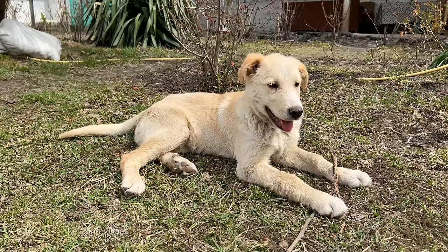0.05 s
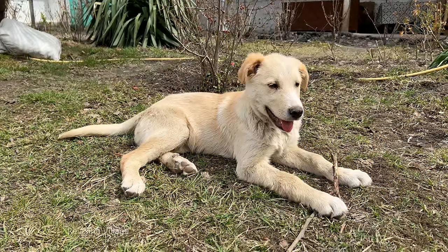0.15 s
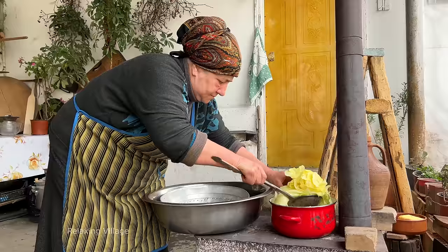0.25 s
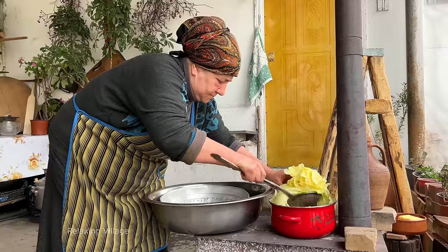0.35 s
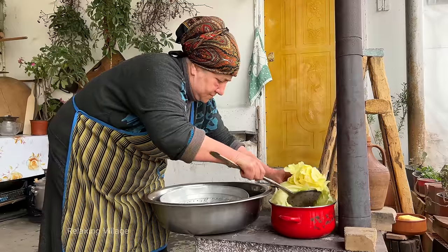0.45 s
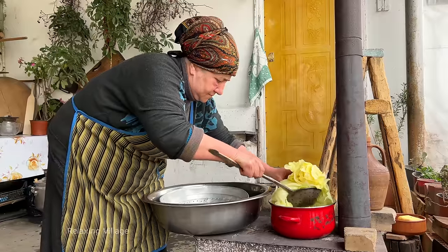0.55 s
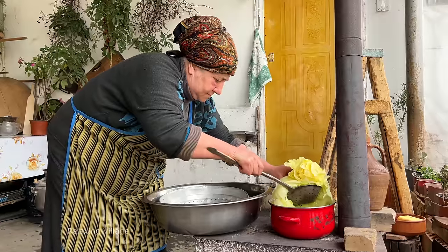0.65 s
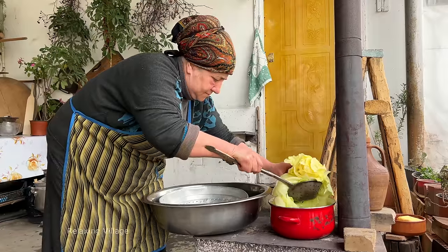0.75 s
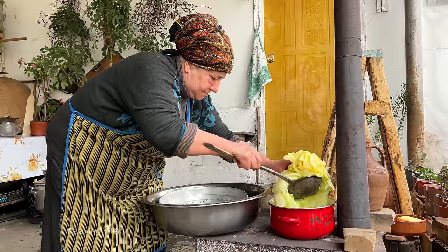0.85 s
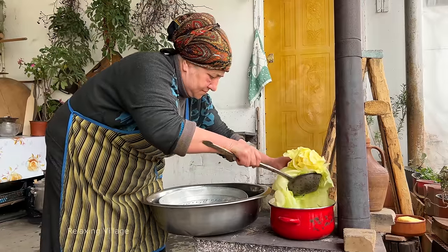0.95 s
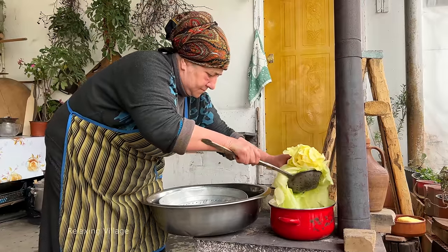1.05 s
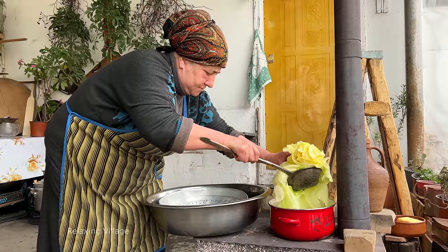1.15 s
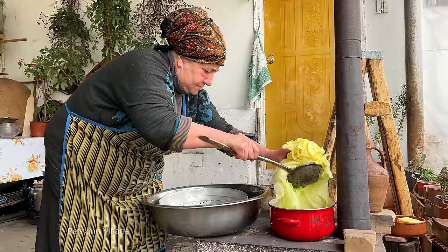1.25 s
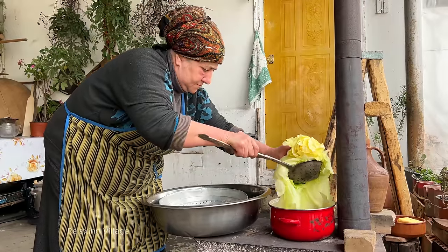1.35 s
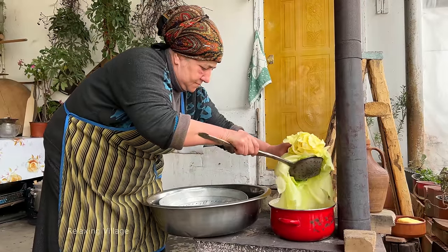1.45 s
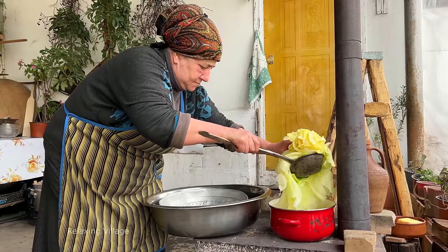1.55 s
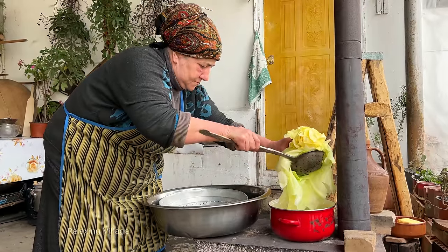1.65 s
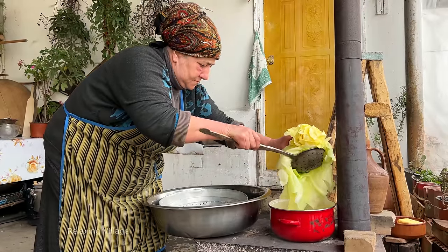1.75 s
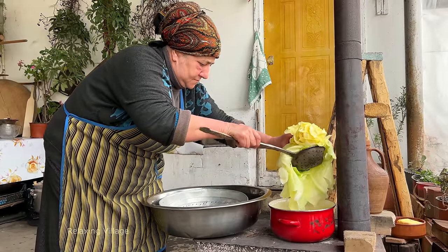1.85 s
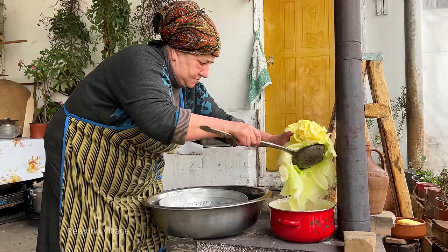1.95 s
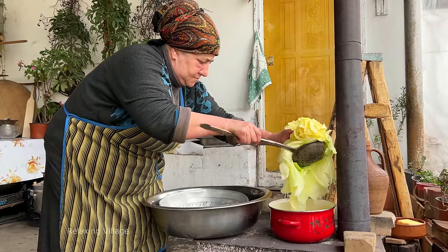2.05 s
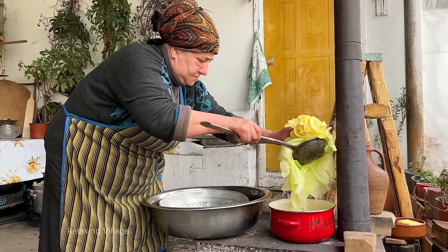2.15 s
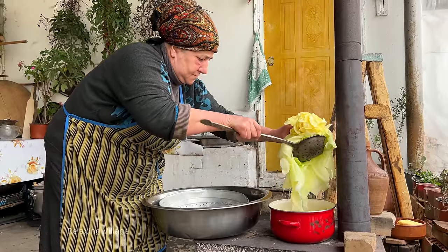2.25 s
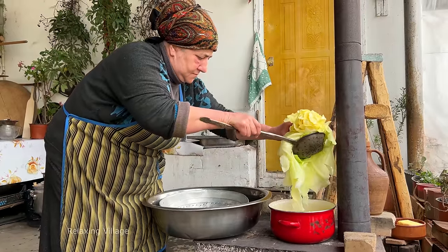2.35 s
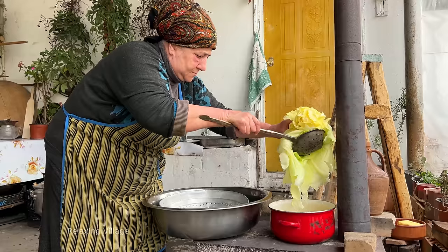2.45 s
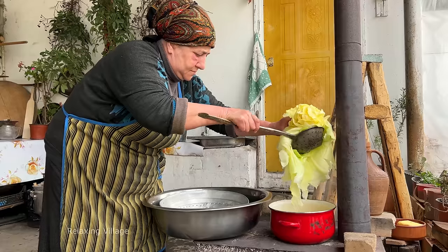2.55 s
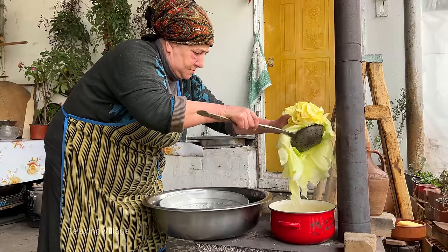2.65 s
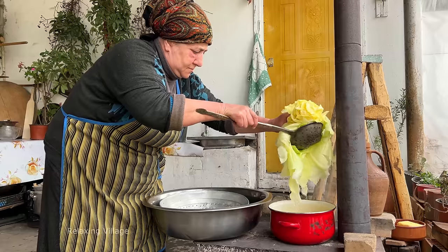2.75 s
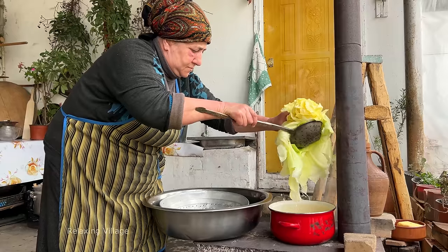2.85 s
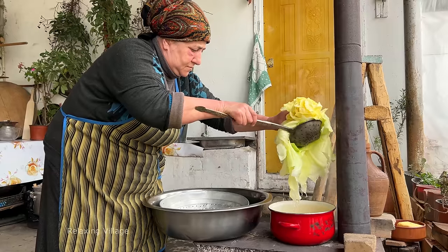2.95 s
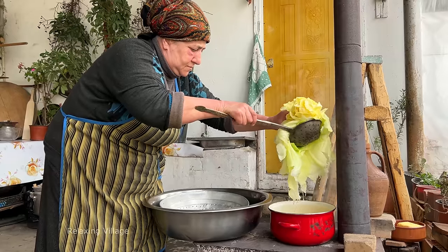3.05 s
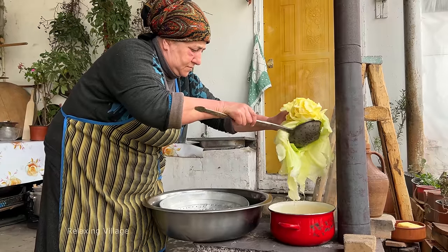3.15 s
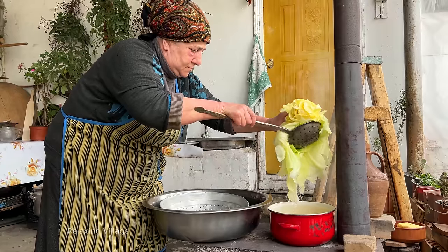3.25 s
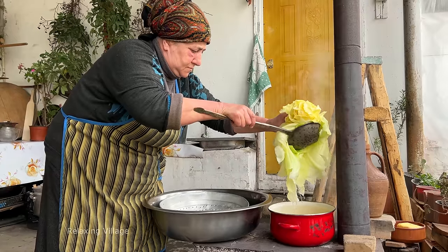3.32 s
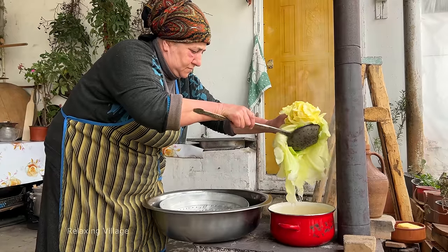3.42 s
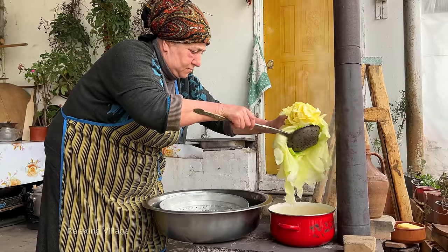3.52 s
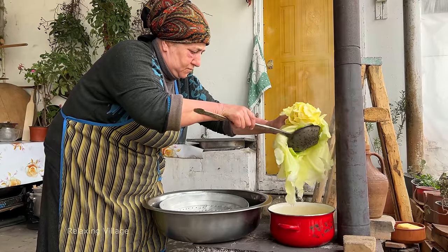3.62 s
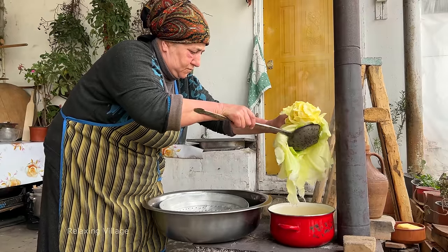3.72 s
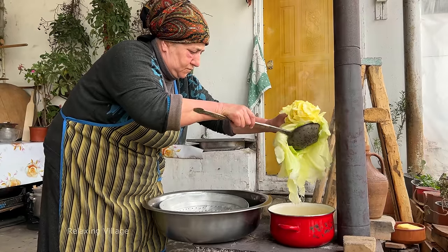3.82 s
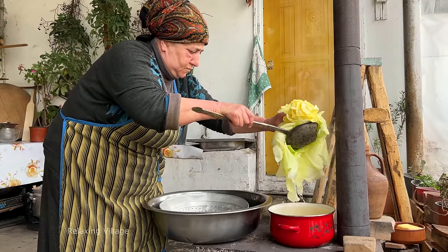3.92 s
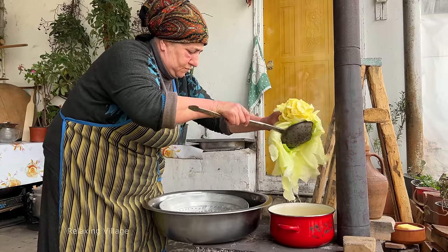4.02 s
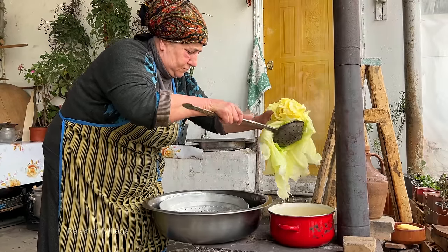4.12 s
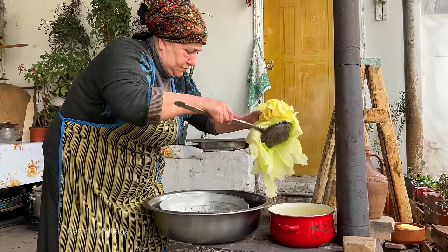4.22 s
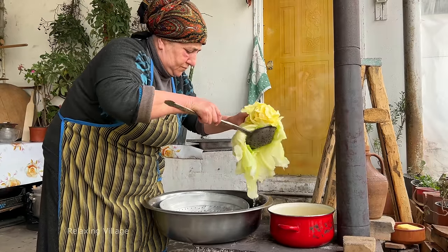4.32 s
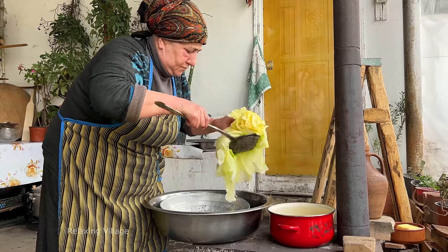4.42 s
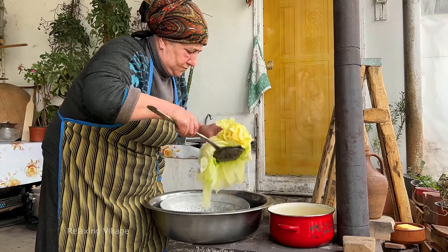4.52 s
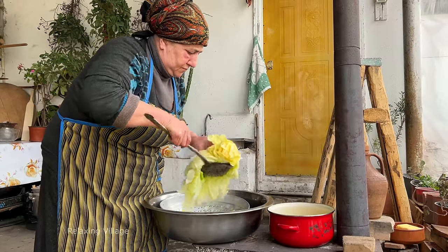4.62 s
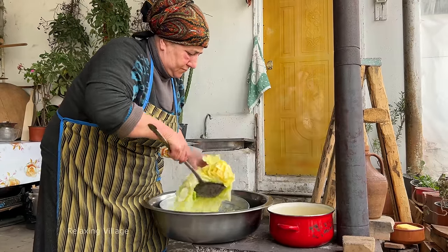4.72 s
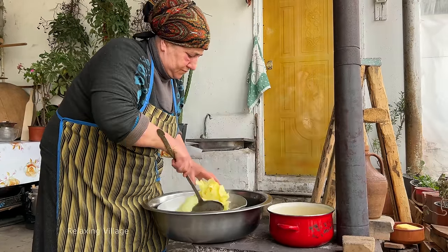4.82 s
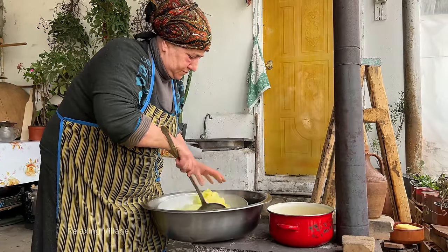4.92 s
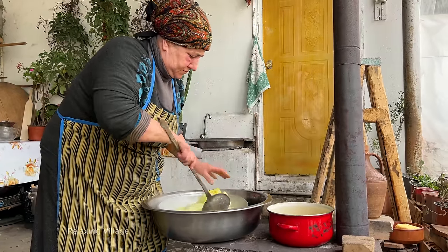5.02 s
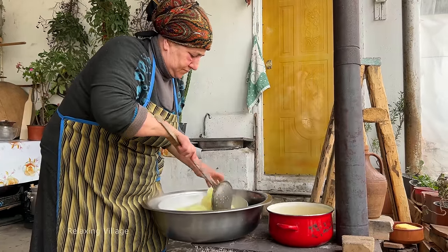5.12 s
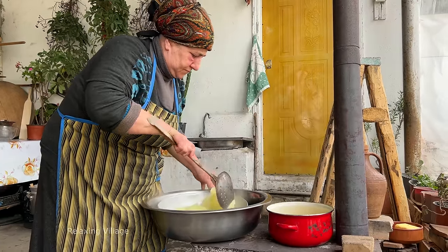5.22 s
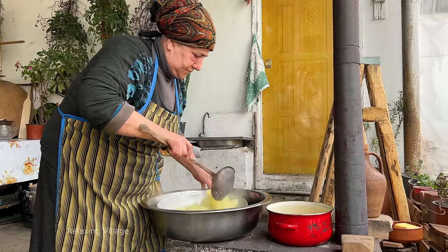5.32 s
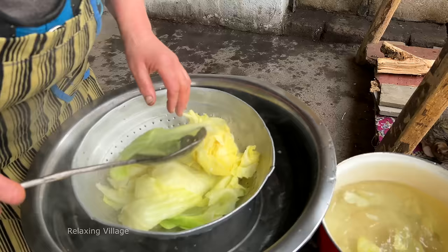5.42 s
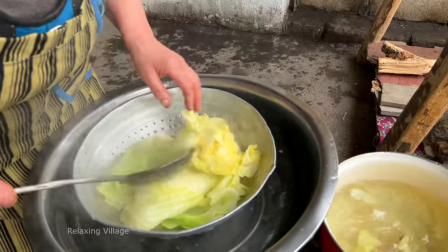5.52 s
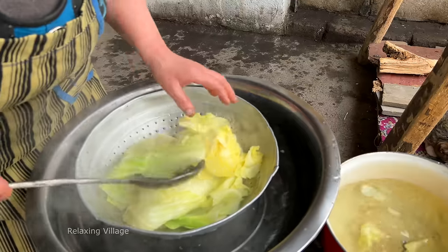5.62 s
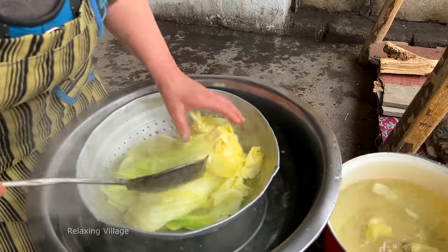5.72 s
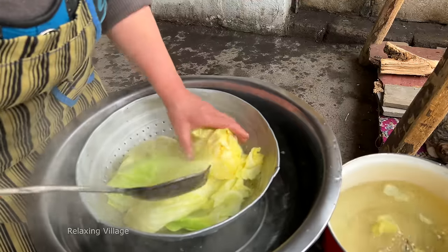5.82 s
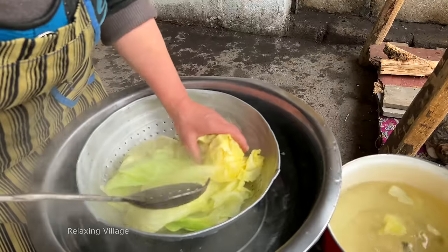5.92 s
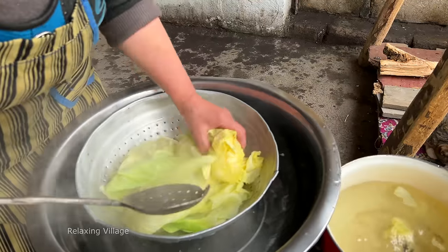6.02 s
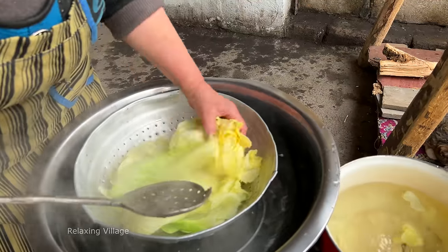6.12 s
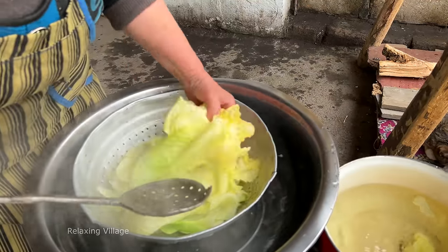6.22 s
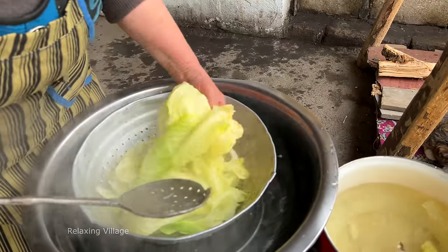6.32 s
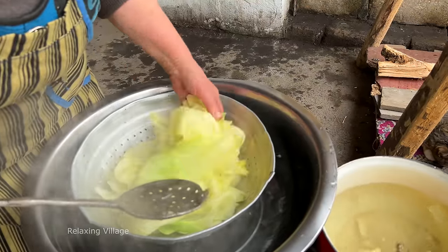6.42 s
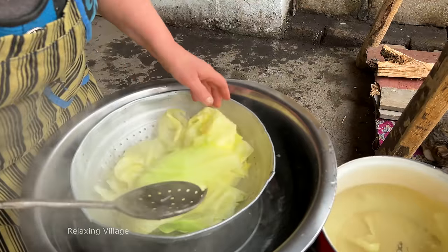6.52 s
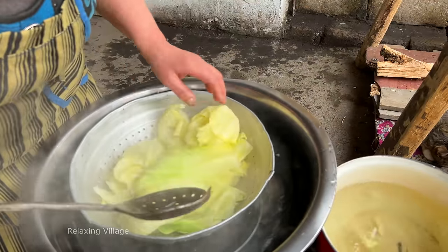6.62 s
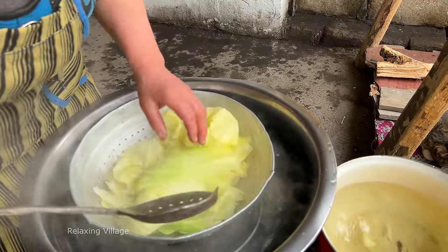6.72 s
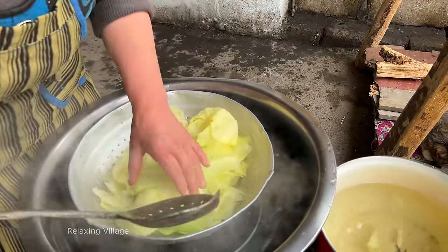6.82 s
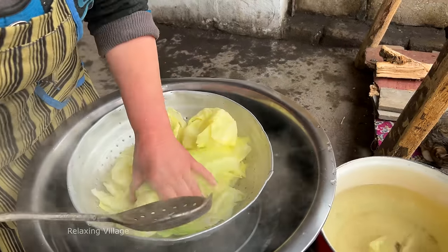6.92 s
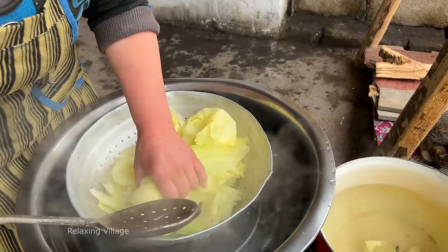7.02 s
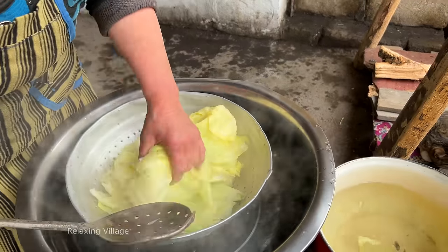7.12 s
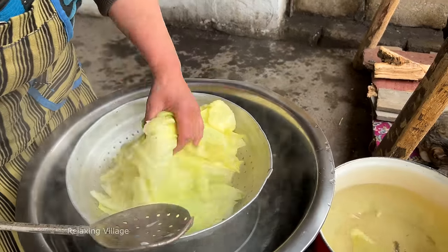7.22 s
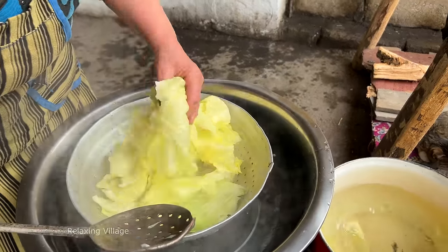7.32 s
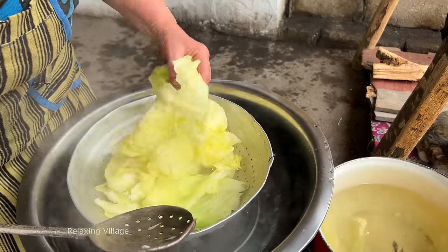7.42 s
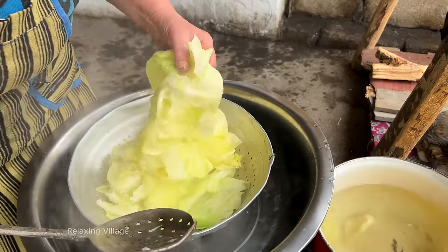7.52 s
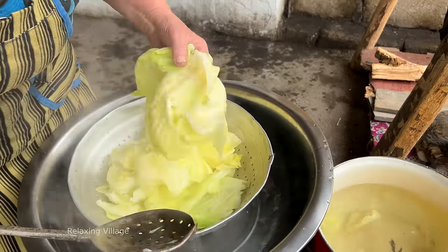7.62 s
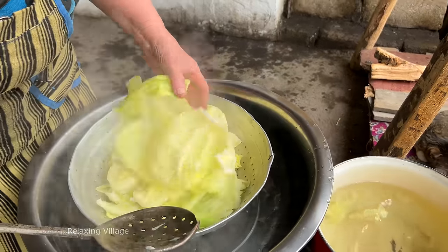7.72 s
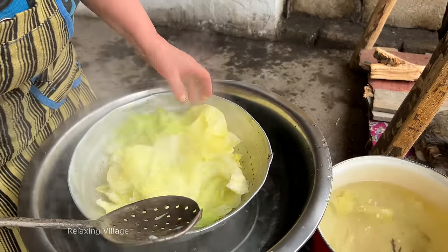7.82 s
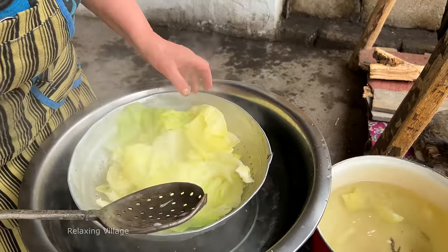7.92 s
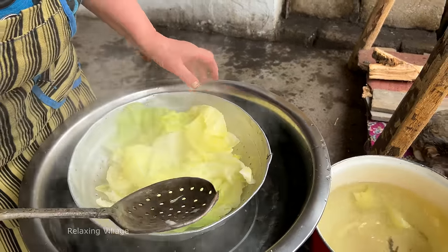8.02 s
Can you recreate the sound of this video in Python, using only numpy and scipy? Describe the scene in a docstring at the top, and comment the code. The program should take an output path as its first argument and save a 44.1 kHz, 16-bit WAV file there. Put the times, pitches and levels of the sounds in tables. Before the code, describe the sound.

Fluttering wind, then dripping and sizzling over a rumbling stove, a heavy wet cabbage flop in a metal basin, and soft squelchy handling.

```python
"""A breeze, as fluttering noise, stops abruptly and gives way to a yard where a stove fire rumbles.
Leaves rustle out of a pot; water trickles back as patter and ringing bubbles; spills sizzle on the hot
plate as dense noise bursts. The flue throbs as a wavering low tone, and the stove top knocks as damped
modes. Wet cabbage flops into a colander in a steel basin: thud, slap, gulping air, spray, ringing steel.
Last, a hand turns and squeezes the leaves: squelching noise, tiny bubbles and smaller landings."""
import sys
import numpy as np
from scipy import signal
from scipy.fft import rfft, irfft, next_fast_len
from scipy.io import wavfile
from scipy.ndimage import uniform_filter1d, map_coordinates

SR = 44100
rng = np.random.default_rng(int(sys.argv[2]) if len(sys.argv) > 2 else 0)


def to_wav(sig):
    """Store sig (one row per channel, or 1-D mono) as 16-bit WAV at the path in sys.argv[1].

    Samples outside -1..1 are clipped; the rate is SR.
    """
    pcm = np.clip(np.atleast_2d(sig), -1, 1) * 32767
    pcm = np.round(pcm).astype(np.int16)
    wavfile.write(sys.argv[1], SR, pcm.T)  # frames by channels


N = 355446

# All levels in the tables are relative: the functions add their own trims in dB.
GARDEN_END_S, TURNING_START_S = 0.295, 5.469
SIMMER_START_S = 1.392  # the plate gets wet
HISS_FADE_DB_PER_S, SPIT_FADE_DB_PER_S = 1.16, 1.5  # the plate slowly dries; spitting fades faster
SIMMER_HISS_DB, SIMMER_SPIT_DB = -46, -57
SURGE_RISE_S, SURGE_T60_S = 0.01, 0.46
TOUCH_LEAD_S, TOUCH_RISE_S, TOUCH_DB = 0.025, .05, -7  # leaf tips touch down ahead of the heap
FLOP_SAG_DB_PER_S = 64  # a landing weakens while the heap collapses
DAMPED_ABOVE_HZ = 440  # with leaves settled in the colander, modes above this die sooner
TOP_HZ = 15900  # upper band limit

# Water running into the pot. Each row: time in seconds, level in dB.
TRICKLE_FLOW = [(1.33, -72), (1.38, -52.5), (1.57, -54.5), (1.99, -62), (2.025, -50), (2.08, -53.5),
                (2.604, -55.5), (2.8, -52.5), (3.0, -54), (3.2, -51.5), (3.5, -57), (4.06, -61),
                (4.1, -45.5), (4.23, -51), (4.583, -52), (4.8, -59)]
# Rumble of the fire. Each row: time in seconds, level in dB.
FIRE_RUMBLE = [(0.3, -63), (1.8, -63.5), (2.25, -54.5), (3.5, -57), (3.8, -50), (4.9, -52.5), (5.25, -53),
               (5.45, -61), (5.75, -52.5), (6.1, -61.5), (6.28, -56.5), (6.5, -52.5), (7.1, -59.5),
               (7.7, -57), (8.06, -60)]
# Fattest drops falling into the pot. Each row: start in seconds, level in dB, initial pitch in Hz, t60 in seconds.
FAT_DROPS = [(0.845, -42, 1890, 0.018), (0.972, -51, 1335, .06), (1.046, -42.5, 2400, .025),
             (2.020, -38, 790, 0.048), (2.166, -38, 804, 0.058), (2.690, -42, 1220, 0.04),
             (2.747, -34, 810, .02), (2.768, -38, 670, .04), (2.795, -35, 625, 0.066),
             (2.816, -35.5, 740, 0.038), (2.814, -37, 1215, .04), (2.863, -39.5, 824, .04),
             (2.912, -39, 1215, 0.05), (2.921, -39, 767, .04), (3.06, -40, 730, .035),
             (3.117, -35.5, 1340, .025), (3.126, -34, 775, .03), (3.155, -32, 755, 0.035),
             (3.177, -35, 792, .03), (3.198, -34, 776, 0.041), (3.212, -38, 737, 0.056),
             (3.246, -45, 795, .06), (3.265, -41, 608, .06), (3.289, -43, 628, 0.045),
             (3.286, -43.5, 1220, .05), (3.311, -45, 1200, 0.043), (3.35, -46, 820, 0.058),
             (3.369, -41.5, 1260, 0.04), (3.383, -37, 846, 0.042), (3.678, -37.5, 810, 0.035),
             (3.760, -31, 820, .02), (3.762, -38, 1190, .02), (3.996, -34, 783, 0.038),
             (4.22, -37, 1160, 0.036)]
# Taps of the skimmer and spits of water. Each row: start in seconds, level in dB, pitch in Hz, ring t60 in seconds.
TAP_EVENTS = [(0.615, -53, 1515, 0.05), (0.69, -39.5, 780, 0.016), (.953, -40, 740, 0.025),
              (1.05, -60, 2509, 0.25), (1.322, -32.5, 720, 0.025), (1.323, -34, 2340, 0.012),
              (1.348, -42, 2500, .02), (1.36, -40.5, 2510, .02), (1.397, -35.5, 1880, 0.015),
              (2.337, -31.5, 8200, 0.022), (3.118, -37, 4430, 0.02), (4.416, -38, 3850, 0.014),
              (4.459, -42, 1880, .025), (4.471, -37, 1700, 0.039), (5.498, -41.5, 5000, 0.02),
              (5.527, -45, 1000, 0.013), (5.589, -30, 1090, 0.022), (5.6, -44, 1680, 0.012),
              (5.634, -41, 3260, .012), (5.647, -49, 2200, 0.01), (5.741, -42, 750, 0.011),
              (5.743, -50, 2070, 0.011), (5.767, -35.5, 680, 0.02), (5.767, -45, 1950, .012),
              (5.869, -43.5, 8050, .006), (6.468, -41.5, 2780, 0.036), (6.509, -47, 2780, .04),
              (6.522, -49, 2900, .035), (6.532, -43, 3260, 0.027), (6.538, -39, 3350, 0.028),
              (6.589, -34, 930, 0.021), (6.859, -46, 5130, 0.0061), (7.281, -45, 3600, .015),
              (7.353, -36, 11000, .005), (7.569, -43.5, 3800, .02), (7.578, -39, 1550, 0.02),
              (7.821, -42, 3000, 0.019), (7.829, -38, 3920, 0.0079), (7.825, -42, 11000, .005)]
# Wet leaves landing. Each row: start in seconds, thud, slap and spray levels in dB, spray cutoff in Hz,
# collapse time in seconds, pitch of the trapped air in Hz, rise time constant and t60 in seconds.
LANDINGS = [(4.845, -26, -26, -25.5, 13800, 0.088, 633, 0.0028, 0.47),
            (4.939, -47, -27, -43, 14000, 0.0041, 1560, 0.0034, 0.19),
            (5.524, -43, -58, -72, 5000, 0.0048, 600, 0.0026, 0.096),
            (5.584, -39, -41.5, -46.5, 5500, 0.012, 850, .004, 0.19),
            (5.63, -51, -48, -45.5, 9000, 0.016, 2200, .002, 0.14),
            (5.723, -53, -68, -58, 9000, 0.0017, 1210, 0.0033, 0.1),
            (5.766, -48.5, -64, -60, 8000, 0.0032, 800, 0.0022, 0.15),
            (6.458, -43.5, -44, -41.5, 9000, 0.0086, 780, .005, 0.037),
            (6.590, -45.5, -51, -46, 14000, 0.011, 935, 0.0019, 0.3),
            (7.348, -47.5, -48, -43, 14000, 0.003, 1100, 0.002, 0.25),
            (7.559, -46, -46.5, -47.5, 4500, 0.0099, 1040, 0.0037, 0.19),
            (7.576, -46, -44.5, -64, 4500, 0.0077, 900, 0.0019, 0.08),
            (7.774, -51, -54, -57, 9000, 0.027, 910, 0.0036, 0.22),
            (7.813, -49, -47, -47, 14000, 0.0062, 1260, 0.0065, 0.17),
            (7.965, -49, -48.5, -48.5, 3800, 0.018, 840, 0.0091, 0.13)]
# Modes of the steel basin with its colander. Each row: mean pitch in Hz, level in dB, undamped t60 in seconds.
BASIN_MODES = [(202.2, 3, 0.52), (221.4, 1.5, 0.54), (251, 4, 0.5), (272, -6.5, 0.94), (306, 9.5, 0.31),
               (339, -4, 0.9), (354, 2, 0.82), (454, -2, 0.31), (536, -3, 0.53), (575, 1.5, 0.72),
               (620, 2, 0.84), (668, -6, 0.64), (720, -3, 0.3), (820, -13, 0.45), (877, -9, 0.61),
               (1164, 0, 0.78), (1660, 0.5, 0.71), (1896, -4, 0.62), (2065, -11.5, 0.81), (2490, -3, 0.81)]
# Resonances of the air in the pot. Each row: centre in Hz, width in Hz, level in dB.
POT_RESONANCES = [(676, 220, -6.5), (812, 106, -3), (1190, 124, -4), (1886, 59, -7.5)]
# Spectra of the noises, before each is brought to rms 1. Each row: frequency in Hz, level in dB.
BREEZE_SPECTRUM = [(25, -21), (90, -11.5), (150, -12.5), (250, -7), (370, -3), (600, -17.5), (1300, -18.5),
                   (2000, -23), (5500, -26.5), (9000, -33), (12300, -41), (16000, -43)]
YARD_SPECTRUM = [(100, -10), (200, -7), (380, -8.5), (800, -9.5), (3000, -17), (7000, -26), (12000, -38),
                 (16000, -47)]
RUMBLE_SPECTRUM = [(20, -36), (50, -2), (100, 0), (160, -6), (280, -13), (700, -20), (2000, -46.5)]
FLUE_SPECTRUM = [(20, -21), (48, -6), (70, 3.0), (110, -43), (300, -58)]
HISS_SPECTRUM = [(1200, -39), (3000, -8.5), (4200, -7), (5500, -1.5), (7200, -1.5), (8700, 1),
                 (10000, -3.5), (12300, -9), (15500, -4.5)]
SPIT_SPECTRUM = [(150, -41), (450, -1), (800, -2.5), (1500, -1.5), (2000, 0.5), (2800, 3.5), (3700, -5.5),
                 (7000, -19)]
THUD_SPECTRUM = [(40, -32), (150, -26), (210, 7.5), (290, -1.5), (400, -2.5), (540, -6), (800, -11.5),
                 (1500, -16.5), (4000, -42)]
SPRAY_SPECTRUM = [(600, 0), (2000, 2), (3000, 1.5), (6000, 2), (8000, -2), (10000, -2), (12300, -12.5),
                  (15500, -7.5)]
SLIDE_SPECTRUM = [(200, 4), (600, 2), (1500, 1.5), (2700, 3), (4000, 1.5), (7000, -3), (8800, 1.5),
                  (10500, -2), (12300, -24), (15500, -16)]
LIFT_SPECTRUM = [(300, -9), (1200, 4.5), (2700, 3), (4000, -13), (6500, -6.5), (10000, -26), (16000, -32)]
# The colander rubbing on the basin. Each row: start in seconds, length in seconds, level in dB, pitch in Hz.
COLANDER_RUBS = [(5.88, 0.062, -55.5, 238), (7.237, 0.14, -54.5, 336.6), (7.373, 0.068, -49, 329),
                 (7.86, 0.1, -52.5, 311)]
# Correlation of the two microphone ports. Each row: frequency in Hz, correlation from 0 to 1.
PORT_LIKENESS = [(60, .985), (300, .92), (900, .68), (1800, .3), (3500, .42), (5000, .15), (7000, .28),
                 (8500, .8), (15000, .88)]
# Level of the left port over the right. Each row: frequency in Hz, difference in dB.
PORT_LEAN = [(100, .5), (500, 2), (1200, .5), (2600, -1.5), (4400, 5), (6500, 4), (8500, 0)]
# Phase by which the left port leads. Each row: frequency in Hz, lead in radians.
PORT_LEAD = [(1000, 0), (1450, -.9), (3000, 1.3), (4400, .9), (5700, .2), (7700, .7), (8650, 0),
             (11950, -6.28), (12400, -6.28), (15400, -12.57)]
# Spills on the hot plate. Each row: start in seconds, fine hiss in dB, coarse spitting in dB,
# wetting time in seconds, boil-off t60 in seconds.
PLATE_SPILLS = [(1.319, -51, -55.5, 0.0049, 1.5), (1.4, -50, -46, 0.32, .8), (2.13, -42, -47, 0.15, 4.5),
                (3.11, -45, -51, 0.0058, 0.45), (4.409, -44, -50.5, 0.0044, 1.5),
                (4.53, -39, -54, 0.049, 0.24), (4.671, -49.5, -67, 0.027, 1.2),
                (5.147, -42, -50, 0.016, 0.26), (5.32, -70, -51.5, 0.022, 0.48),
                (5.975, -52, -66, 0.015, 1.7), (6.595, -56, -73, 0.014, 0.82)]
# Surges of the throb in the flue. Each row: start in seconds, hold in seconds, level in dB, pitch in Hz.
FLUE_SURGES = [(3.55, 0.17, -34.5, 66), (3.776, 0.089, -29.5, 66.8), (3.96, 0.21, -38, 62.76),
               (4.22, 0.13, -34, 67), (4.445, 0.08, -36.5, 66.7), (4.598, 0.058, -39, 70.9),
               (4.743, 0.21, -42.5, 72.3), (4.961, 0.25, -55, 71.4)]
# Leaves rustling out of the pot. Each row: time in seconds, level in dB.
LEAF_LIFT = [(0.32, -100), (0.56, -79), (0.85, -74), (1.0, -64.5), (1.19, -68.5), (1.3, -71)]
# Leaves sliding in the colander. Each row: time in seconds, level in dB.
LEAF_SLIDE = [(5.48, -63.5), (5.7, -62.5), (5.85, -65), (6.05, -58.5), (6.17, -55.5), (6.22, -62),
              (6.42, -60.5), (6.57, -61.5), (6.69, -61.5), (6.78, -56), (6.85, -61), (7.05, -64),
              (7.2, -76.5), (7.42, -58), (7.52, -62), (7.7, -73), (8.06, -96)]
# Fingers squeezing the leaves. Each row: start in seconds, thud in dB, spray in dB, rise time constant
# in seconds, t60 in seconds, squirt level in dB, squirt pitch in Hz.
LEAF_SQUEEZES = [(0.588, -80, -85, .004, 0.16, -65, 3100), (0.615, -78, -86, .004, 0.36, -64, 1400),
                 (1.046, -78, -85, .004, .6, -65, 2500), (5.973, -41.5, -41, 0.0087, 0.23, -44, 7500),
                 (6.265, -47, -56, .005, 0.12, -65, 2680), (6.72, -45, -47, 0.028, 0.31, -73, 3000),
                 (6.902, -53, -45.5, 0.019, 0.23, -66, 6540), (7.109, -47.5, -53, .004, 0.18, -55.5, 4930),
                 (7.280, -52.5, -45, 0.0022, 0.23, -44, 4000), (7.411, -53, -56, 0.01, 0.25, -56, 1400)]
# Knocks and rattles on the stove top as the leaves swing across it. Each row: start in seconds,
# ring level in dB, crack level in dB, crack pitch in Hz.
STOVE_KNOCKS = [(4.414, -27.5, -34.5, 1150), (4.426, -44, -37, 900), (4.432, -37, -35, 750),
                (4.447, -38, -41, 1000), (4.456, -50, -44, 1000), (4.484, -47, -44, 1100)]
# Modes of the stove top's sheet steel. Each row: pitch in Hz, level in dB, t60 in seconds.
PLATE_MODES = [(105, 5.5, 0.14), (182, 4.5, 0.057), (417, -10, 0.12), (851, -11, 0.066),
               (1075, -3.5, 0.044), (1350, -11, 0.036), (1730, -12, 0.04)]
# Air gulping out from under the leaves. Each row: start in seconds, level in dB, initial pitch in Hz, t60 in seconds.
AIR_POCKETS = [(4.846, -17.5, 266, 0.11), (4.850, -20, 522, .09), (4.866, -21, 833, 0.05),
               (4.888, -16.5, 257, 0.073), (4.9, -13, 520, 0.062), (4.928, -21, 683, 0.093),
               (4.956, -21, 717, 0.096), (4.99, -32, 566, 0.12), (5.075, -39, 519, 0.16),
               (5.1, -37, 218, 0.19), (5.16, -45, 335, 0.15), (5.165, -44, 573.5, 0.14),
               (5.530, -33, 252, .07), (5.571, -34, 328, .03), (5.597, -26, 215, 0.09),
               (5.6, -31.5, 106, 0.093), (5.727, -39, 350, .035), (5.769, -33, 377, 0.034),
               (5.980, -42, 680, 0.023), (6.463, -32, 434, 0.022), (6.598, -37.5, 620, 0.057),
               (7.356, -36, 200, 0.22), (7.354, -41, 1115, 0.14), (7.56, -40, 1200, .035),
               (7.578, -35, 883, 0.063), (7.58, -33, 134, 0.058), (7.591, -39, 1050, .04),
               (7.977, -41, 885, .04), (7.99, -43, 620, .05), (6.695, -43, 520, .06),
               (6.728, -43.5, 1230, 0.042)]
# Narrow dips in the microphone's treble response. Each row: centre in Hz, width in Hz, depth in dB.
TREBLE_DIPS = [(10180, 290, -4.5), (13500, 270, -5)]


def amp(db):
    """Definition of the decibel: level to amplitude ratio."""
    return np.exp(np.asarray(db) * (np.log(10) / 20))


def unit(x):
    """Normalisation to a root-mean-square of 1."""
    return x / np.sqrt(np.mean(x ** 2) + 1e-20)


def clock():
    """Sampling: the time of every sample in seconds."""
    return np.arange(N) / SR


def along(points, hz):
    """Linear interpolation of (Hz, value) points on a logarithmic frequency axis."""
    f, v = np.transpose(points)
    return np.interp(np.log(hz + 1), np.log(f + 1), v)


def curves(rows):
    """Linear interpolation in time: one curve for each column after the time."""
    s, *columns = np.transpose(rows)
    return [np.interp(clock(), s, column) for column in columns]


def between(start, end):
    """Gating: 1 from start to end, with 3 ms fades."""
    return np.clip(np.minimum(clock() - start, end - clock()) / .003, 0, 1)


def wobble(rate):
    """Slow random modulation: a smooth curve through rate random knots a second."""
    knots = rng.standard_normal(int(N * rate / SR) + 4)
    return map_coordinates(knots, [clock() * rate])


def swell(t, rise, hold, t60):
    """Exponential attack from t = 0 and, after the hold, exponential decay."""
    attack = 1 - np.exp(-np.maximum(t, 0) / rise)
    return attack * amp(-60 * np.maximum(t - hold, 0) / t60)


def filtered(x, response):
    """Linear filtering: multiplication by a complex response in the frequency domain."""
    m = next_fast_len(N + SR // 2)
    hz = np.fft.rfftfreq(m, 1 / SR)
    return irfft(rfft(x, m) * response(hz), m)[..., :N]


def add(track, s, sound):
    """Superposition: mix a sound into a track at time s."""
    start = max(round(s * SR), 0)
    part = track[..., start:start + sound.shape[-1]]
    part += sound[..., :part.shape[-1]]


def crackle(rate, noise_db):
    """Shot noise: two streams of random impulses, rate a second, on a bed of smooth white noise."""
    impulses = (rng.random((2, N)) < rate / SR) * rng.standard_normal((2, N))
    bed = amp(noise_db) * rng.standard_normal((2, N))
    return unit(unit(impulses) + bed)


def patchy(pair, depth_db):
    """Time-varying colour: a smoothed random gain over time and frequency, as small wet cavities open and close."""
    z = signal.stft(pair, nperseg=512)[2]
    field = rng.standard_normal(z.shape[1:])
    for axis in 0, 1:
        field = uniform_filter1d(field, size=4, axis=axis)
    return signal.istft(z * amp(depth_db * unit(field)), nperseg=512)[1][:, :N]


def burst(hz, spread, t, order):
    """Band-limited noise of rms 1 around hz, as long as t."""
    ratio = 1 + spread
    band = signal.butter(order, [hz / ratio, hz * ratio], "band", fs=SR)
    return unit(signal.lfilter(*band, rng.standard_normal(len(t))))


def placed(pair, spectrum):
    """Partial correlation: two independent streams, coloured and mixed to the likeness of the ports at rms 1."""
    def mix(hz):
        turn = np.arccos(along(PORT_LIKENESS, hz)) / 2
        return amp(along(spectrum, hz)) * np.array([np.cos(turn), np.sin(turn)])

    shared, apart = filtered(pair, mix)
    return unit(np.array([shared + apart, shared - apart]))


def walls(x, t60, wet_db):
    """Reverberation: convolution with a short decaying noise tail, different at each port."""
    t = np.arange(SR // 4) / SR
    tail = rng.standard_normal((2, len(t))) * amp(-60 * t / t60)
    tail = tail / np.linalg.norm(tail[0])
    return x + amp(wet_db) * signal.fftconvolve(np.atleast_2d(x), tail, axes=1)[:, :N]


def bubble(hz, cycles, glide):
    """Bubble resonance: a sine decaying by 60 dB over its cycles; positive glide raises the pitch."""
    age = np.arange(int(SR * cycles / hz) + 2) * hz / SR  # in cycles
    phase = 2 * np.pi * age * (1 + glide * age / cycles)
    return np.sin(phase) * amp(-60 * age / cycles) * (1 - np.exp(-age))


def garden(flutter_db=2, level_db=-40.0):
    """Turbulence: coloured noise flutters in level like a breeze through a garden."""
    air = placed(crackle(700, noise_db=3.5), BREEZE_SPECTRUM)
    return air * amp(level_db + flutter_db * wobble(53.3)) * between(-1, GARDEN_END_S)


def stove(yard_db=-67, rumble_db=2, throb_db=-1.0, flutter_db=-10, waver_db=2.0):
    """Combustion noise and pipe resonance: the fire rumbles and the flue throbs in surges at its lowest mode."""
    yard = amp(yard_db) * placed(rng.standard_normal((2, N)), YARD_SPECTRUM)
    fire_db, = curves(FIRE_RUMBLE)
    rumble_level = amp(fire_db + rumble_db + 2.7 * wobble(12))
    rumble = rumble_level * placed(rng.standard_normal((2, N)), RUMBLE_SPECTRUM)
    flue_hz, = curves([(s + hold / 2, hz) for s, hold, db, hz in FLUE_SURGES])
    surges = [amp(db) * swell(clock() - s, SURGE_RISE_S, hold, SURGE_T60_S) for s, hold, db, hz in FLUE_SURGES]
    draw = np.max(surges, axis=0)
    tone = np.sqrt(2) * np.sin(2 * np.pi * np.cumsum(flue_hz) / SR)
    flutter = placed(rng.standard_normal((2, N)), FLUE_SPECTRUM)
    throb = amp(throb_db) * tone + amp(flutter_db) * flutter
    return yard + rumble + draw * amp(waver_db * wobble(24.93)) * throb


def boiling(rise_share=0.94):
    """Addition of powers: hiss and spit strengths of a fading simmer and of each spill's flare."""
    t, before_turning = clock(), between(-1, TURNING_START_S)
    fade = np.outer([HISS_FADE_DB_PER_S, SPIT_FADE_DB_PER_S], t - SIMMER_START_S)
    simmer = between(SIMMER_START_S, TURNING_START_S) * amp(-fade)
    power = (amp([[SIMMER_HISS_DB], [SIMMER_SPIT_DB]]) * simmer) ** 2
    for s, fine_db, coarse_db, wetting, t60 in PLATE_SPILLS:
        flare = swell(t - s, rise_share * wetting, wetting, t60)
        if s < TURNING_START_S:
            flare = flare * before_turning
        power = power + (amp([[fine_db], [coarse_db]]) * flare) ** 2
    return np.sqrt(power)


def sizzle(hiss_db=2.5, spit_db=3, ping_db=-3, count=400):
    """Boiling on a hot plate: many fine bursts, coarser spits and tiny ringing bubbles."""
    fine, coarse = boiling()
    hiss = placed(crackle(3500, noise_db=4.0), HISS_SPECTRUM) * amp(hiss_db + 0.15 * wobble(45))
    spits = placed(patchy(crackle(600, noise_db=1), depth_db=2.0), SPIT_SPECTRUM)
    spits = spits * amp(spit_db + 0.62 * wobble(35))
    pings = np.zeros(N)
    for when, pitch, size in rng.random((count, 3)):
        ping = amp(10 * size ** 3) * bubble(3000 * 3 ** pitch, cycles=40, glide=.03)
        add(pings, when * N / SR, amp(ping_db) * ping)
    pings = pings * between(-1, TURNING_START_S)
    return walls(fine * (hiss + pings) + coarse * spits, t60=0.095, wet_db=-8.0)


def hollow(hz):
    """Cavity resonance: the pot's air modes summed with alternating sign."""
    response = 0
    for k, (centre, width, db) in enumerate(POT_RESONANCES):
        loss = 1j * hz * width
        response = response + (-1) ** k * amp(db) * loss / (centre ** 2 - hz ** 2 + loss)
    return response


def trickle(stream_db=-3, drop_db=1, splash_db=-21, plink_db=4, count=110):
    """Impact noise and entrained air: a stream patters in the hollow pot and fat drops trap bubbles."""
    flow_db, = curves(TRICKLE_FLOW)
    stream = patchy(crackle(600, noise_db=0), depth_db=3)[0]
    patter = unit(filtered(stream, hollow))
    force = amp(flow_db + stream_db) * between(TRICKLE_FLOW[0][0], TRICKLE_FLOW[-1][0])
    bubbles, t = np.zeros(N), np.arange(SR // 10) / SR
    for when, pitch, size in rng.random((count, 3)):  # small bubbles follow the flow
        plink = amp(plink_db + 8 * size) * bubble(550 * 3.7 ** pitch, cycles=40, glide=.08)
        add(bubbles, when * N / SR, force[int(when * N)] * plink)
    for s, db, hz, t60 in FAT_DROPS:
        ring = bubble(hz, cycles=hz * t60, glide=rng.uniform(-.04, .13))
        add(bubbles, s, amp(db + drop_db) * ring)
        add(force, s, amp(db + splash_db - 60 * t / 0.023))  # splash
    return walls(patter * force + bubbles, t60=.1, wet_db=-8)


def taps(ring_db=0, crack_db=-5):
    """Impulsive excitation: each small contact is a dull crack with a brief ring."""
    track, t = np.zeros(N), np.arange(SR // 20) / SR
    for s, db, hz, t60 in TAP_EVENTS:
        crack = burst(hz, 0.56, t, order=2) * amp(crack_db - 60 * t / 0.017)
        ring = bubble(hz, cycles=hz * t60, glide=0)
        add(track, s, amp(db) * crack)
        add(track, s, amp(db + ring_db) * ring)
    return walls(track, t60=.13, wet_db=-7)


def knocks():
    """Modal vibration: sharp contacts crack and set the stove top's steel modes ringing."""
    track, t = np.zeros(N), np.arange(SR // 4) / SR
    ring = np.zeros(len(t))
    for hz, db, t60 in PLATE_MODES:
        ring += amp(db - 60 * t / t60) * np.sin(2 * np.pi * hz * t) * (1 - np.exp(-hz * t))
    for s, ring_db, crack_db, hz in STOVE_KNOCKS:
        crack = burst(hz, 0.61, t, order=3) * swell(t, 0.0006, 0.0032, 0.014)
        add(track, s, amp(ring_db) * ring + amp(crack_db) * crack)
    return walls(track, t60=.08, wet_db=-14)


def leaves(far_db=3.5, close_db=4, clump_db=2, pop_db=-3, count=900):
    """Wet friction: leaves rustle as they are lifted, then squelch as they slide, with tiny bubbles popping."""
    lift_db, = curves(LEAF_LIFT)
    slide_db, = curves(LEAF_SLIDE)
    lifted = amp(lift_db + far_db) * between(LEAF_LIFT[0][0], SIMMER_START_S)
    turned = amp(slide_db + close_db + clump_db * wobble(30)) * between(TURNING_START_S, np.inf)
    rustle = placed(patchy(crackle(300, noise_db=3), depth_db=4.0), LIFT_SPECTRUM)
    squelch = placed(patchy(crackle(1500, noise_db=4), depth_db=3), SLIDE_SPECTRUM)
    pops = np.zeros(N)
    for when, pitch, size in rng.random((count, 3)):
        pop = amp(14 * size ** 2) * bubble(900 * 10 ** pitch, cycles=20, glide=.05)
        add(pops, when * N / SR, amp(pop_db) * pop)
    return lifted * rustle + turned * (squelch + walls(pops, t60=.05, wet_db=-4))


def basin(ring_db=-11, slosh=0.00455, rub_db=3, settled_db=-1.0):
    """Modal vibration: landings ring the steel, its pitch swaying with the water; the rubbed colander hums."""
    track, t = np.zeros(N), np.arange(SR * 3 // 4) / SR
    hz, mode_db, t60 = np.transpose(BASIN_MODES)[:, :, None]
    swayed = np.cumsum(1 + slosh * wobble(13)) / SR  # time stretched by the sloshing
    onset = 1 - np.exp(-t / 0.016)
    free = amp(mode_db - 60 * t / t60) * onset
    damping = np.maximum(hz / DAMPED_ABOVE_HZ, 1) ** 2
    damped = amp(mode_db + settled_db - 60 * t / t60 * damping) * onset
    for s, weight_db, *_ in LANDINGS:
        later = np.take(swayed, round(s * SR) + np.arange(len(t)), mode="clip")
        age = later - np.interp(s, clock(), swayed)
        strength = amp(weight_db + ring_db + rng.normal(0, 2, hz.shape))
        decay = free if s < TURNING_START_S else damped
        modes = np.sin(2 * np.pi * (hz * age + rng.random(hz.shape)))
        add(track, s, np.sum(strength * decay * modes, axis=0))
    for s, length, db, pitch_hz in COLANDER_RUBS:
        stroke = np.sin(np.pi * np.minimum(t / length, 1))
        jitter = np.cumsum(rng.normal(0, 0.043, len(t)))
        add(track, s, amp(db + rub_db) * stroke * np.sin(2 * np.pi * pitch_hz * t + jitter))
    return walls(track, t60=.06, wet_db=-19)


def pockets(level_db=0, glide=0.061):
    """Trapped-air resonance: air escapes from under the leaves in gulps, each rising a little in pitch."""
    track = np.zeros(N)
    for s, db, hz, t60 in AIR_POCKETS:
        add(track, s, amp(db + level_db) * bubble(hz, cycles=hz * t60, glide=glide))
    return walls(track, t60=.08, wet_db=-16)


def landing(t, rise, collapse, t60):
    """Contact force of a heap of leaves: it rises, sags while the heap collapses, then fades."""
    return swell(t, rise, collapse, t60) * amp(-FLOP_SAG_DB_PER_S * np.minimum(t, collapse))


def flops(thud_db=1, slap_db=0, spray_db=3.5, first_spray_db=-3.0, gurgle_db=2, gurgle_s=0.052,
          lump_db=1.7, count=8):
    """Soft impact: leaves land with thud, slap of trapped air and gurgle; collapse and squeezing spray droplets."""
    thud, slaps, pressed = np.zeros((3, N))
    spray, t = np.zeros((2, N)), np.arange(SR // 2) / SR
    droplets = placed(patchy(crackle(1500, noise_db=8.5), depth_db=3.0), SPRAY_SPECTRUM)
    for s, weight_db, air_db, wet_db, top_hz, collapse, hz, rise, t60 in LANDINGS:
        touch = amp(TOUCH_DB) * landing(t, TOUCH_RISE_S, 0, t60)
        blow = landing(t, rise, collapse, t60)
        for start, force in (s - TOUCH_LEAD_S, touch), (s, blow):
            add(thud, start, amp(weight_db + thud_db) * force)
            add(slaps, start, amp(air_db + slap_db) * force * burst(hz, 0.74, t, order=3))
        squirt = landing(t, rise, 0, t60)
        dull = signal.butter(2, top_hz, fs=SR)
        # one spray at the impact, another when the heap has collapsed
        for start, db in (s, wet_db + first_spray_db), (s + collapse, wet_db):
            cloud = np.take(droplets, rng.integers(N) + np.arange(len(t)), axis=1, mode="wrap")
            add(spray, start, amp(db + spray_db) * signal.lfilter(*dull, squirt * cloud))
        for late, pitch in rng.random((count, 2)):  # later bubbles are weaker
            gurgle = bubble(hz * 2 ** (1.6 * pitch - .7), cycles=24, glide=.08)
            start = s + rise + late * (collapse + gurgle_s)
            add(slaps, start, amp(air_db + gurgle_db - 20 * late) * gurgle)
    for s, weight_db, wet_db, rise, t60, squirt_db, hz in LEAF_SQUEEZES:
        press = swell(t, rise, 0, t60)
        add(thud, s, amp(weight_db + thud_db) * press)
        add(pressed, s, amp(wet_db + spray_db) * press)
        add(slaps, s, amp(squirt_db) * press * burst(hz, 0.43, t, order=3))
    slaps = slaps * unit(amp(lump_db * np.clip(wobble(220), -2, 2)))  # folds close one after another
    body = thud * placed(crackle(900, noise_db=-5.0), THUD_SPECTRUM)
    wet = spray + pressed * droplets
    return body + walls(slaps, t60=0.075, wet_db=-5.5) + walls(wet, t60=0.15, wet_db=-9.0)


def scene():
    """Superposition of all the sources."""
    background = garden() + stove() + sizzle() + trickle()
    contacts = taps() + knocks() + leaves()
    return background + contacts + basin() + pockets() + flops()


def record(dry):
    """Two-port reception: the ports differ in level and phase, the treble is notched and the band limited."""
    def response(hz):
        half = amp(along(PORT_LEAN, hz) / 2) * np.exp(1j * along(PORT_LEAD, hz) / 2)
        dips_db = sum(db * np.exp(-((hz - centre) / width) ** 2) for centre, width, db in TREBLE_DIPS)
        return np.array([half, 1 / half]) * amp(dips_db) * (hz < TOP_HZ)

    return filtered(dry, response)


dry = scene()
out = record(dry)
to_wav(out)
```